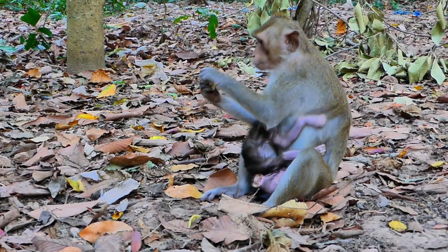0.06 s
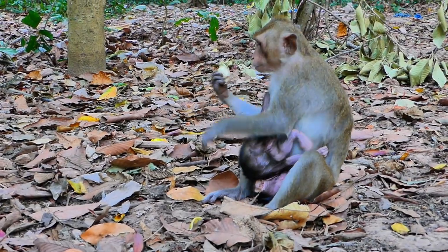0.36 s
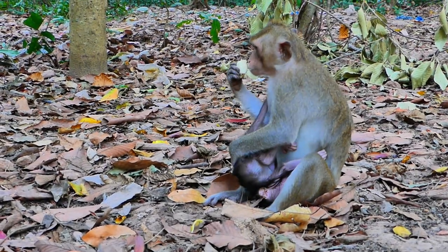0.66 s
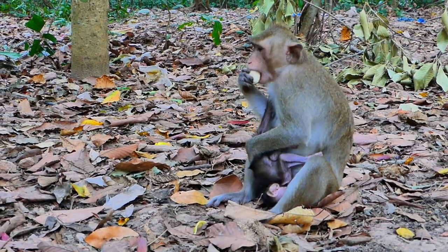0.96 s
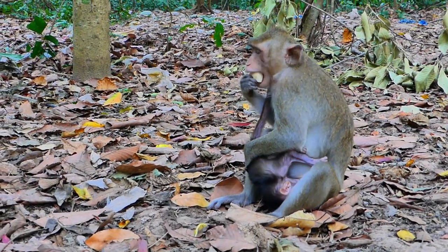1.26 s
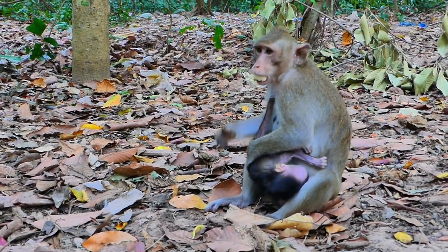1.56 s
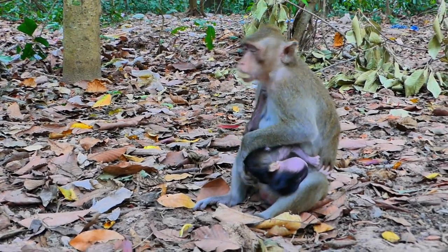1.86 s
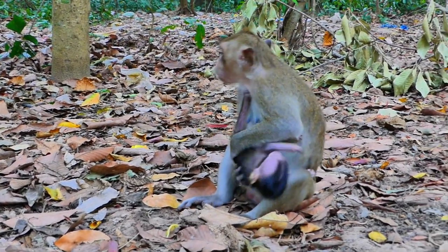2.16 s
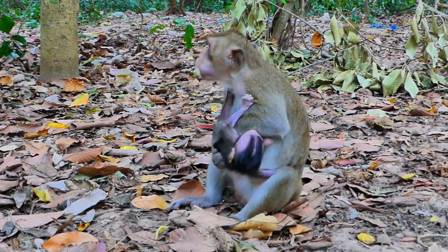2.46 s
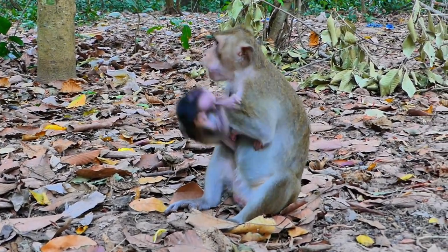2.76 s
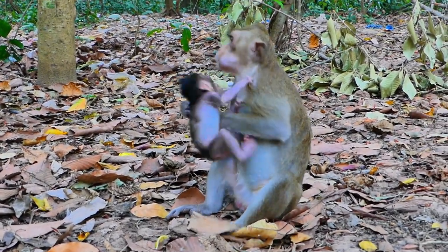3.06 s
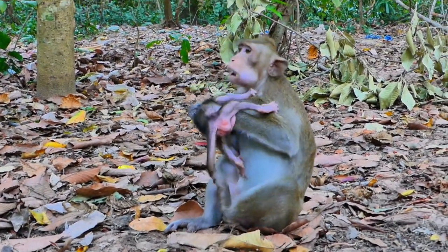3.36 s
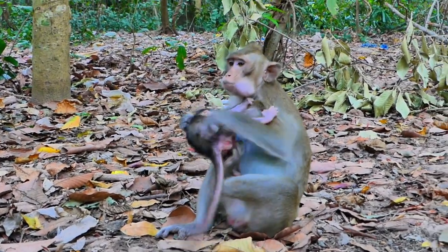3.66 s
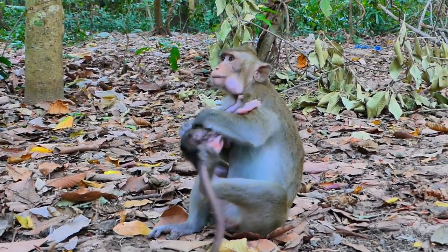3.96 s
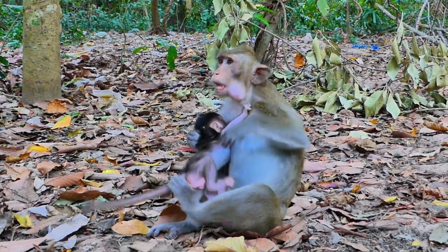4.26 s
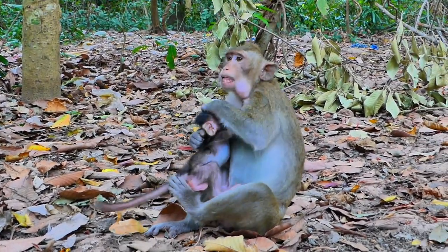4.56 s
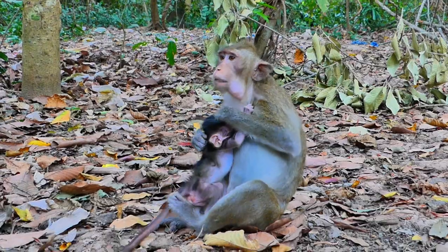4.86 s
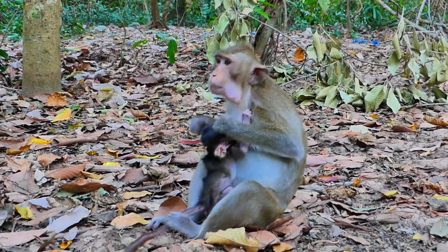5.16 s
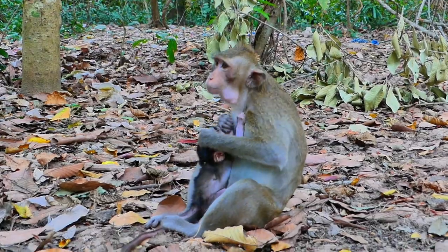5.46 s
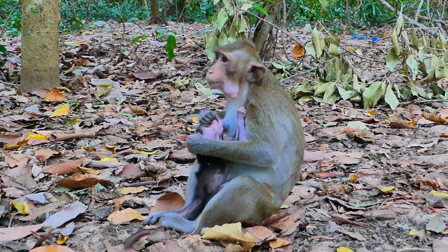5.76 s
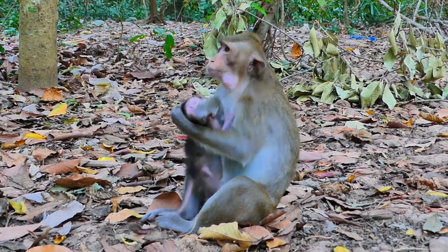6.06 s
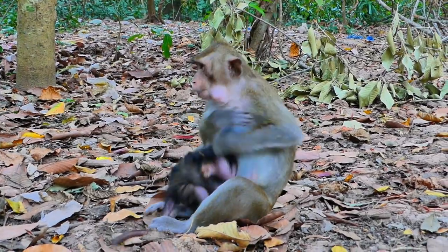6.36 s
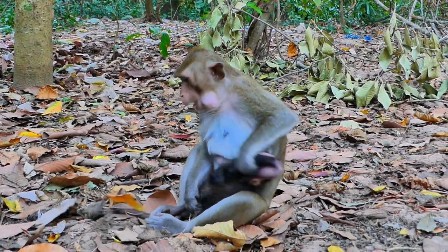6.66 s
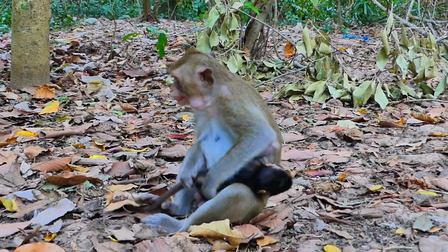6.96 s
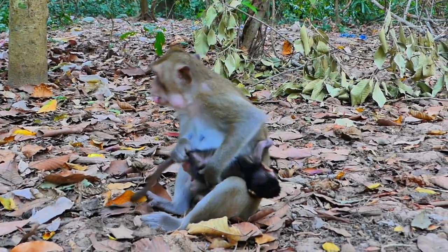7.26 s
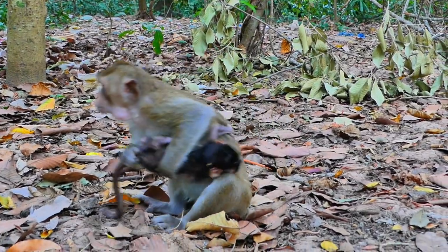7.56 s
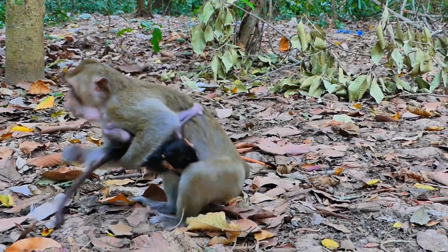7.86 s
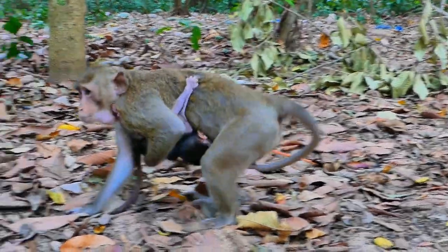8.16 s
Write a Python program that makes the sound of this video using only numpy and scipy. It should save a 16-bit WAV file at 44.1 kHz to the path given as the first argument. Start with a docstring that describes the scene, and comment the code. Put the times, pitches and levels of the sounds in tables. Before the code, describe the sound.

Two birds whistle high, thin phrases over a quiet forest hiss and the throb of a far engine. A baby monkey close by lets out a quick run of shrill, raspy squeaks that echo briefly off the trees. Its mother grunts very softly and dry leaves crackle as they shift. A second run of squeaks follows, then one more bird phrase and a last faint rustle.

```python
"""A far engine throbs under the hiss of a forest, where two birds begin to repeat their whistled songs.
A mother macaque, handling her infant on dry leaves, grunts softly; at 2.4 s it screams in short squeaks,
each a chaotic rasp of the vocal folds that relaxes into falling whistles, thrown back by the trunks.
From 4.2 s she grunts again and the leaves crackle as the monkeys shift. A second bout of squeaks
comes at 5.9 s; then one bird sings once more, and at 8 s the leaves stir a last time."""
import sys
import numpy as np
from scipy import signal
from scipy.fft import rfft, irfft
from scipy.io import wavfile
from scipy.ndimage import map_coordinates

SR = 44100
rng = np.random.default_rng(int(sys.argv[2]) if len(sys.argv) > 2 else 0)


def unload_audio(sound):
    """Save the sound as a 16-bit wav file, at the path given as the first command line argument."""
    columns = np.transpose(np.atleast_2d(sound))
    # keep every value between -1 and 1, then stretch to whole-number steps
    steps = np.round(np.clip(columns, -1, 1) * 32767)
    wavfile.write(sys.argv[1], SR, steps.astype(np.int16))


N = 371322


# The infant's squeak cues: t/s, rasp length/s, rasp level/dB, fade over the rasp/dB, pitch/Hz,
# mouth resonance/Hz, its gain/dB, bright resonance/Hz, its gain/dB,
# whistle delay/s, whistle length/s, main whistle level/dB, upper whistle level/dB
SQUEAKS = [ (2.3947, 0.0046, -40, 5.5, 5830, 12500, -7, 8200, -17, .002, 0.0099, -74, -47),
           (2.401, .013, -44.5, -2.5, 3213, 5600, 1, 6900, -2, 0.008, 0.01, -46, -46),
           (2.669, 0.029, -34.5, -1.5, 5500, 6780, -5, 9220, -3.5, 0.017, 0.016, -39.5, -56),
           (2.851, .042, -34.5, 10.5, 5750, 7230, -4, 10000, -28, 0.0021, 0.034, -40, -58),
           (3.0145, 0.047, -31.5, 18.5, 5360, 9150, -6, 9800, -17, 0.017, .012, -42.5, -65),
           (3.19, .003, -47, 3, 6000, 3270, 0, 12700, -11, 0.0069, 0.017, -78, -58.5),
           (3.2075, 0.0089, -43, 6, 2950, 3470, 3, 6940, -10, .001, 0.012, -36, -41.5),
           (5.9227, 0.033, -31.5, 5.5, 4237, 5750, 4, 9050, 1.5, .02, .016, -45.5, -40.5),
           (6.104, .034, -32.5, 7, 4214, 7310, -4, 9370, 0.5, .013, .027, -40.5, -46),
           (6.3215, 0.03, -34.5, 1, 5270, 6660, -1, 9200, 5, .02, .015, -38.5, -41.5),
           (6.504, 0.033, -40.5, -4, 4925, 7000, 2, 14800, -12, 0.02, 0.017, -43.5, -41.5),
           (6.7065, 0.016, -38, 3, 5190, 2930, -13, 8460, -13.5, 0.0029, 0.014, -39, -59)]


def infant(top_hz=13500, top_db=-8, edge_share=0.71, spacing_share=0.42, rough_per_s=10.6,
           undertone_db=-27, overtone_db=-20.5):
    """Two stems, rasps and whistles: each rasp locks into four whistles, rougher after a long rasp."""
    rasps, whistles = np.zeros((2, N))
    for (start, length, db, fade_db, pitch_hz, mouth_hz, mouth_db, bright_hz, bright_db,
         delay, whistle_length, main_db, upper_db) in SQUEAKS:
        resonances = [(pitch_hz, 0), (mouth_hz, mouth_db), (bright_hz, bright_db), (top_hz, top_db)]
        add(rasps, start, undb(db) * rasp(length, fade_db, edge_share * pitch_hz, resonances))
        ladder_db = [main_db + undertone_db, main_db, upper_db, upper_db + overtone_db]
        for rung, rung_db in enumerate(ladder_db, start=-1):
            hz = pitch_hz * (1 + rung * spacing_share)
            tone = whistle(whistle_length, hz, rough_per_s * length)
            add(whistles, start + delay, undb(rung_db) * tone)
    return rasps, whistles


def rasp(length, fade_db, edge_hz, resonances, width_hz=550, widening=0.18, fall=0.1094, hiss_db=-17,
         throat_db=-21, flutter_db=-1.7, wander_hz=290, locking=0.47, notch_depth=0.66):
    """Chaotic vocal folds excite resonances, which grow more tonal and sink as the effort ends."""
    t = np.arange(4096) / SR
    progress = np.minimum(t / length, 1.2)
    lock = locking * (0.34 + progress)
    folds = rng.standard_normal(len(t))
    voice = 0
    for hz, db in resonances:
        harsh = resonate(folds, hz, width_hz + widening * hz)
        # crossfade from noise towards a partial that wanders inside the resonance
        partial = np.sqrt(2) * np.sin(phase_of(hz + wander_hz * walk(447, len(t))))
        voice += undb(db) * (np.sqrt(1 - lock) * harsh + np.sqrt(lock) * np.std(harsh) * partial)
    # turbulent air fills the valleys above a sharp edge; the throat hums weakly below it
    voice += undb(hiss_db) * shape(folds, lambda f: 1 / (1 + (edge_hz / f) ** 20))
    voice += undb(throat_db) * resonate(folds, 0.61 * edge_hz, 400)
    voice = unit(voice * undb(flutter_db * walk(350, len(t))))
    speed = 1 + fall * (.25 - progress ** 3)  # varispeed bends the whole rasp down
    voice = map_coordinates(voice, [np.cumsum(speed)], order=5, mode="wrap")
    # an antiresonance of the throat cuts a notch at the edge
    voice -= notch_depth * resonate(voice, 1.026 * edge_hz, 610)
    fade = undb(-fade_db * np.minimum(progress, 1))
    return voice * fade * gate(t, length, attack=0.0021, release=0.012)


def whistle(length, start_hz, rough, fall=0.116, bend=1.13, jitter=0.082, shimmer_db=8.7, octave_db=-26):
    """The folds lock into one tone that falls ever faster; roughness shakes its pitch and level."""
    t = np.arange(4096) / SR
    glide_hz = start_hz * (1 - fall * np.minimum(t / length, 2) ** bend)
    phase = phase_of(glide_hz * (1 + jitter * rough * walk(700, len(t))))
    tone = np.sqrt(2) * (np.sin(phase) + undb(octave_db) * np.sin(2 * phase))
    shimmer = undb(shimmer_db * rough * walk(400, len(t)))
    return tone * shimmer * gate(t, .9 * length, attack=0.0006, release=0.004)


# The mother's grunt cues: t/s, length/s, level/dB, pitch/Hz, throat resonance/Hz, mouth gain/dB
GRUNTS = [ (1.837, 0.029, -65.5, 422, 483, -6), (2.146, 0.012, -73.5, 417, 440, -22),
          (4.238, 0.028, -68, 236, 516, 6), (4.398, 0.0087, -65, 208, 495, 4),
          (4.549, 0.09, -63.5, 161.2, 484, -1.5), (4.772, 0.0073, -60.5, 208, 513, 4),
          (5.358, 0.0115, -64.5, 200, 420, 7), (5.39, 0.054, -62.5, 157.1, 403, -10)]


def mother(droop=.26, breathiness=.65, mouth_hz=1024, open_db=-19):
    """Loose, sinking pulses and air through throat and mouth; the higher the grunt, the cleaner."""
    out, t = np.zeros(N), np.arange(8192) / SR
    for start, length, db, pitch_hz, throat_hz, mouth_db in GRUNTS:
        sag = droop * (.5 - np.minimum(t / length, 1))
        hz = pitch_hz * (1 + sag + 0.043 * walk(280, len(t)))
        pulses = np.diff(np.floor(np.cumsum(hz) / SR), prepend=0)
        breath = breathiness * 170 / pitch_hz * rng.standard_normal(len(t))
        source = unit(pulses) + breath
        voice = resonate(source, throat_hz, 210) + undb(mouth_db) * resonate(source, mouth_hz, 220)
        voice += undb(open_db) * resonate(source, 1170, 530)
        add(out, start, undb(db) * unit(voice) * gate(t, length, 0.23 * length, 0.14 * length))
    return out


# Spot snaps of leaves and twigs, and at 3.193 s the click that opens an infant's squeak: t/s, level/dB, centre
# f/Hz
SNAPS = [(0.913, -61.5, 2600), (1.732, -64, 7000), (1.846, -60, 1500), (3.178, -56, 1190),
         (3.193, -50, 3100), (3.449, -62, 2730), (4.344, -59.5, 2780), (4.775, -59.5, 11000),
         (5.361, -62, 10500), (5.402, -61, 12500), (5.482, -49, 2190), (8.037, -63, 2200),
         (8.098, -63, 6500), (8.152, -62.5, 4000), (8.366, -66, 5000)]
# The monkeys shift on the leaf litter: t/s, length/s, level/dB
STIRS = [(4.295, .36, -76), (5.35, .09, -75.5), (8.002, 0.14, -84), (8.31, 0.11, -71)]


def leaves(snap_decay_s=0.0031, grains_per_s=1100, cluster_db=1.5, cluster_hz=14, floor_db=-84):
    """Single snaps over a fine crackle of dry leaves, which swells whenever the monkeys move."""
    out, t = np.zeros(N), np.arange(2048) / SR
    for start, db, hz in SNAPS:
        snap = unit(resonate(rng.standard_normal(len(t)), hz, .9 * hz))
        add(out, start, undb(db) * snap * np.exp(-t / snap_decay_s))
    ticks = (rng.random(N) < grains_per_s / SR) * rng.standard_normal(N)
    ticks *= undb(np.minimum(rng.exponential(size=N), 4))  # random accents
    grain = rng.standard_normal(len(t)) * np.exp(-t / 0.0012)
    grains = signal.fftconvolve(ticks, grain)[:N]
    crackle = resonate(grains, 4130, 4400) + 0.3 * resonate(grains, 10000, 5500)
    crackle *= undb(cluster_db * walk(cluster_hz, N))
    stirring = sum(undb(db) * gate(np.arange(N) / SR - start, length, attack=0.068, release=0.14)
                   for start, length, db in STIRS)
    return out + unit(crackle) * (undb(floor_db) + stirring)


# The clear song, a held note, a dip and an upward sweep:
# t into the song/s, length/s, start f/Hz, end f/Hz, relative level/dB, warble depth/Hz
CLEAR_SONG = [ (0, 0.015, 4000, 4230, 3, 8), (.016, .14, 4463, 4327, 0, 7),
              (.21, 0.16, 3777, 4000, -11, 65), (.26, 0.1038, 4424, 4440, -4, 55),
              (.38, .14, 4255, 4150, -2, 16), (.542, .068, 4180, 4957, 2.5, 16),
              (.606, 0.024, 4900, 5050, 5, 17)]
# The second bird's more quavering song: columns as above
QUAVERING_SONG = [ (0, .05, 4090, 4200, 0.5, 29), (.045, .16, 4250, 4380, -1, 44.7),
                  (.205, 0.16, 3917, 3856, -3, 55), (.26, .24, 4403, 4490, -6, 60.9),
                  (.39, 0.18, 4070, 4110, -2, 35), (.55, 0.14, 3980, 4290, -0.5, 30.24),
                  (.6, .115, 4550, 5090, -0.5, 26)]
# Cues for the clear song: t/s, level before the mix/dB
CLEAR_CUES = [(1.176, -66.5), (4.003, -68), (7.463, -68)]
# Cues for the quavering song: t/s, level before the mix/dB
QUAVERING_CUES = [(.937, -67), (5.445, -67)]


def birds(warble_rate_hz=45):
    """Two birds each repeat their own song of pure whistles that slide and quiver."""
    out, t = np.zeros(N), np.arange(16384) / SR
    for song, cues in (CLEAR_SONG, CLEAR_CUES), (QUAVERING_SONG, QUAVERING_CUES):
        for start, song_db in cues:
            for offset, length, start_hz, end_hz, db, warble_hz in song:
                glide_hz = np.interp(t, [0, length], [start_hz, end_hz])
                phase = phase_of(glide_hz + warble_hz * walk(warble_rate_hz, len(t)))
                note = np.sqrt(2) * np.sin(phase) * gate(t, length, attack=.01, release=.013)
                add(out, start + offset, undb(song_db + db) * note)
    return out


def ground(x, scatter_db=-15, scatter_hz=6000):
    """Scatter off the leaf litter ripples the phase between left and right, most in the treble."""
    ripple = walk(300, 8192)
    ripple_hz = np.linspace(0, SR / 2, len(ripple))
    side = shape(x, lambda f: 1j * np.interp(f, ripple_hz, ripple) * np.sqrt(f / scatter_hz))
    return stereo(x, undb(scatter_db) * side)


# EQ of the echo off the trunks: f/Hz, gain/dB
ECHO_EQ = [(300, 8), (2000, 8.5), (2850, -8), (3700, 0), (4900, 3), (9000, 1), (15000, -0.5)]


def forest(x, t60, build_s, correlation, treble_loss=0.46, patchy_db=2.0):
    """Echoes off many trunks build up, then die away, the treble first."""
    t = np.arange(65536) / SR
    apart, common = rng.standard_normal((2, len(t))), rng.standard_normal(len(t))
    echoes = np.sqrt(1 - correlation) * apart + np.sqrt(correlation) * common
    echoes *= undb(patchy_db * walk(110, len(t)))
    decay_db = -60 * t / t60
    echoes *= (1 - np.exp(-t / build_s)) * undb(decay_db)
    echoes = shape(echoes / np.linalg.norm(echoes[0]), lambda f: undb(along(ECHO_EQ, f)))
    treble = shape(echoes, lambda f: 1 / (1 + (9000 / f) ** 6))
    echoes = echoes - treble + treble * undb(treble_loss * decay_db)
    return signal.fftconvolve(x[None], echoes, axes=1)[:, :N]


def engine(firing_hz=22.0, body_hz=122, width_hz=70, db=-69, side_db=-9, throb=0.33):
    """A slow engine far off: each firing arrives as a blurred swell of rumble."""
    firing_phase = phase_of(firing_hz * (1 + 0.026 * walk(8.8, N)))
    swell = 1 + throb * np.cos(firing_phase)
    thuds = unit(resonate(rng.standard_normal(N) * swell, body_hz, width_hz))
    scatter = unit(resonate(rng.standard_normal(N), body_hz, width_hz))
    return undb(db) * stereo(thuds, undb(side_db) * scatter)


# Faint swells of filtered noise: t/s, length/s, centre f/Hz, width/Hz, level/dB
SWELLS = [(0.039, 0.52, 763, 28, -81.5), (2.8, 0.35, 544, 48, -74.5), (.35, 0.25, 3800, 120, -91),
          (6.55, 0.53, 415, 130, -74.5), (6.5, 0.584, 820, 2300, -75)]


def swells():
    """Faint swells of filtered noise, mostly narrow bands, some following the squeaks."""
    out, t = np.zeros((2, N)), np.arange(32768) / SR
    for start, length, hz, width_hz, db in SWELLS:
        for channel in out:
            band = unit(resonate(rng.standard_normal(len(t)), hz, width_hz))
            add(channel, start, undb(db) * band * gate(t, length, attack=0.016, release=0.037))
    return out


# EQ of the ambience bed: f/Hz, relative level/dB
AIR_EQ = [(18, -64), (30, -35), (64, -49), (92, -1.5), (140, -4), (263, -12.5), (341, -16.5), (505, -16.5),
          (575, -20.5), (747, -20), (1110, -20.5), (2020, -22.5), (3680, -32), (5740, -27.5),
          (15500, -36.5)]
# Stereo image of the bed: f/Hz, left-right correlation
AIR_CORRELATION = [(60, 0.97), (130, 0.91), (260, -0.48), (500, -0.41), (1000, 0.13), (3000, 0.51),
                   (12000, 0.55)]


def air(db=-72.5, drift_db=.5, insect_hz=10500, insect_db=4, hollow_hz=7700, hollow_db=5, gap_db=5):
    """A bed of distant rumble and leaf hiss, swelling slightly, with a hollow under a band of insects."""
    def mid_eq(f):
        insects = insect_db * np.exp(-((f - insect_hz) / 450) ** 2)
        hollow = hollow_db * np.exp(-((f - hollow_hz) / 900) ** 2)
        engine_gap = gap_db / (1 + ((f - 125) / 45) ** 2)  # leaves room for the engine
        return undb(along(AIR_EQ, f) + insects - hollow - engine_gap)

    def side_eq(f):
        correlation = along(AIR_CORRELATION, f)
        return mid_eq(f) * np.sqrt((1 - correlation) / (1 + correlation))

    mid = shape(rng.standard_normal(N), mid_eq)
    side = shape(rng.standard_normal(N), side_eq)
    return stereo(mid, side) / np.std(mid) * undb(db + drift_db * walk(2, N))


def undb(db):
    """Decibels to gain."""
    return 10 ** (np.asarray(db) / 20)


def unit(x):
    """Scale to rms 1."""
    return x / np.sqrt(np.mean(x ** 2) + 1e-30)


def add(track, start, x):
    """Mix a sound in at a time in seconds."""
    i = int(start * SR)
    track[i:i + len(x)] += x[:len(track) - i]


def stereo(mid, side):
    """Mid and side to left and right."""
    return np.array([mid + side, mid - side])


def phase_of(hz):
    """Oscillator phase for a pitch curve."""
    return 2 * np.pi * np.cumsum(hz) / SR


def shape(x, gain):
    """EQ by a gain that is a function of frequency."""
    f = np.fft.rfftfreq(x.shape[-1], 1 / SR) + 0.00088  # keeps clear of 0 Hz
    return irfft(rfft(x) * gain(f), x.shape[-1])


def along(points, f):
    """Read (Hz, value) points on a log-frequency axis."""
    hz, value = np.transpose(points)
    return np.interp(np.log(f), np.log(hz), value)


def resonate(x, hz, width):
    """A steep resonant band-pass."""
    return shape(x, lambda f: 1 / (1 + ((f * f - hz * hz) / (f * width)) ** 2))


def walk(rate, size):
    """Smooth random modulator of rms 1 that changes about rate times a second."""
    return unit(shape(rng.standard_normal(size), lambda f: 1 / (1 + (f / rate) ** 4)))


def gate(t, length, attack, release):
    """An envelope that opens at zero and closes softly around the given length."""
    return np.clip(t / attack, 0, 1) * (1 - np.tanh((t - length) / release)) / 2


def scene(rasp_send_db=-13, soft_send_db=-18.5, bird_direct_db=-9, foliage_db=-4.0, bird_echo_db=-2.5):
    """The monkeys sit close and straight ahead; the birds arrive blurred by foliage, mostly as echo."""
    rasps, whistles = infant()
    soft = whistles + mother() + leaves()
    songs = birds()
    # the wide-open mouth throws the rasps furthest into the trees
    send = undb(rasp_send_db) * rasps + undb(soft_send_db) * soft
    monkeys = ground(rasps + soft) + forest(send, t60=.6, build_s=0.002, correlation=0.8)
    foliage = undb(foliage_db) * forest(songs, t60=0.095, build_s=0.0018, correlation=0.93)
    bird_echo = undb(bird_echo_db) * forest(songs, t60=1.2, build_s=0.017, correlation=0.91)
    canopy = undb(bird_direct_db) * songs + foliage + bird_echo
    return monkeys + canopy + engine() + air() + swells()


def record(dry, cutoff_hz=15950):
    """A steep low-pass on the master cuts the top."""
    return signal.sosfilt(signal.ellip(10, .2, 75, cutoff_hz, fs=SR, output="sos"), dry)


dry = scene()
out = record(dry)
unload_audio(out)
```